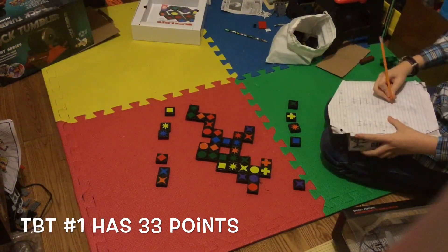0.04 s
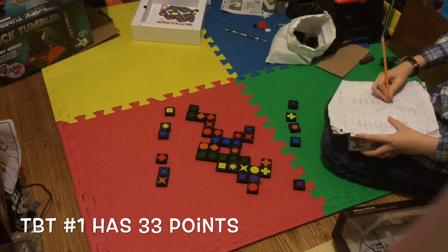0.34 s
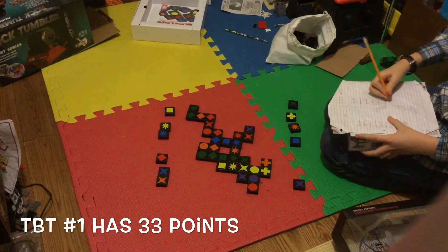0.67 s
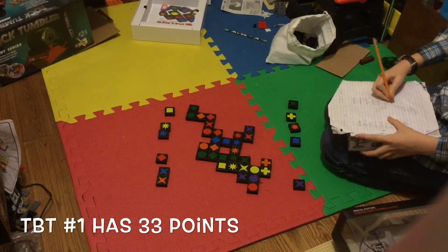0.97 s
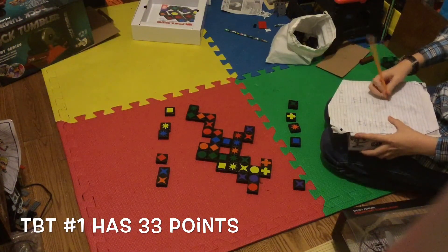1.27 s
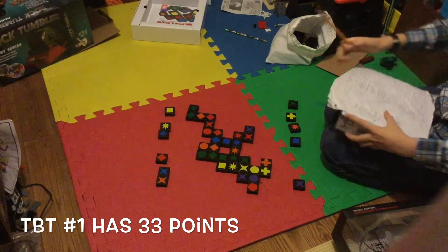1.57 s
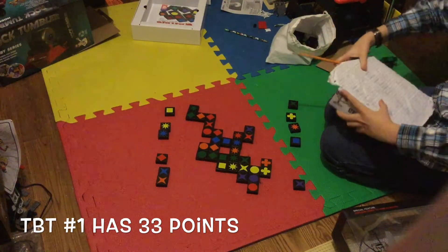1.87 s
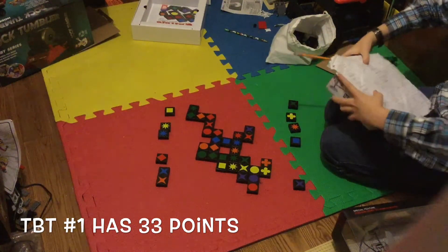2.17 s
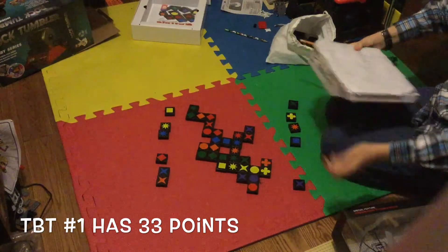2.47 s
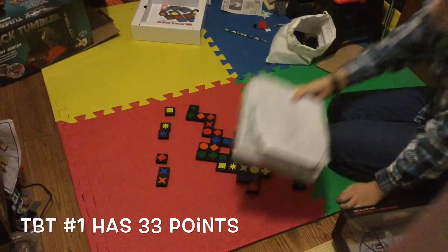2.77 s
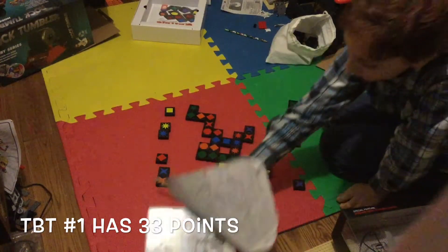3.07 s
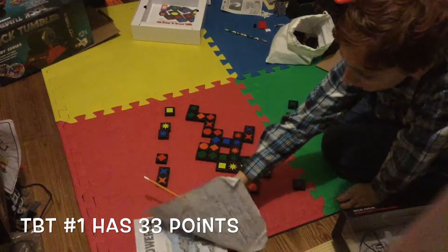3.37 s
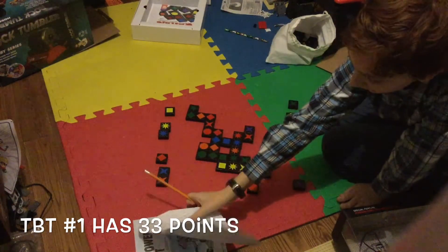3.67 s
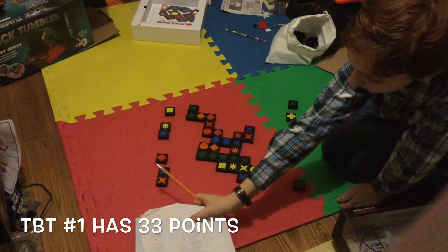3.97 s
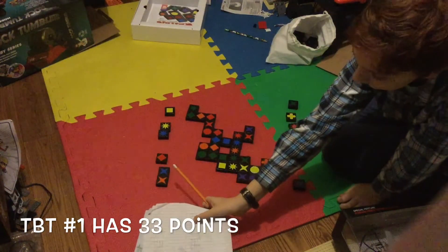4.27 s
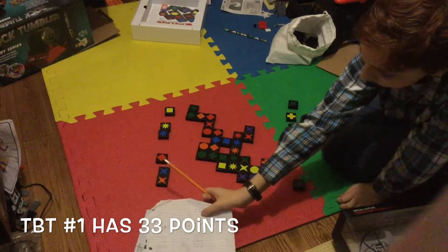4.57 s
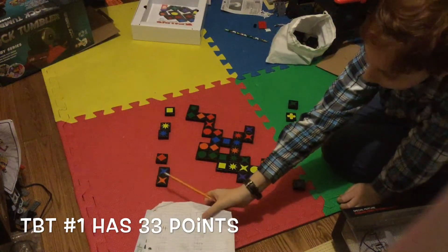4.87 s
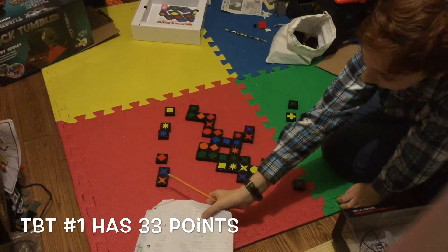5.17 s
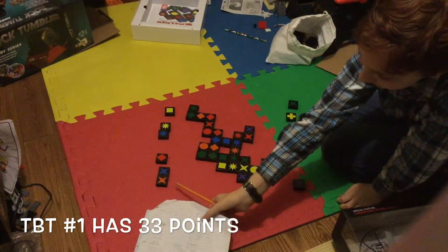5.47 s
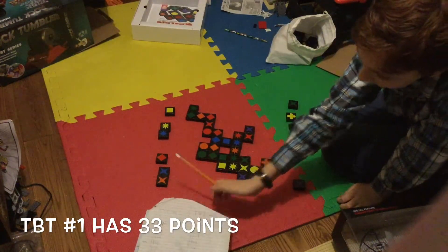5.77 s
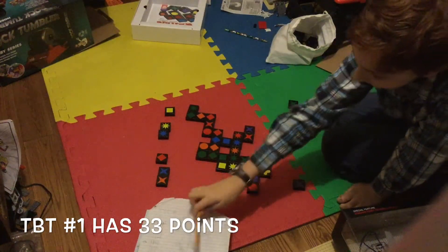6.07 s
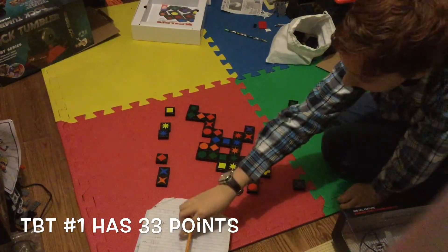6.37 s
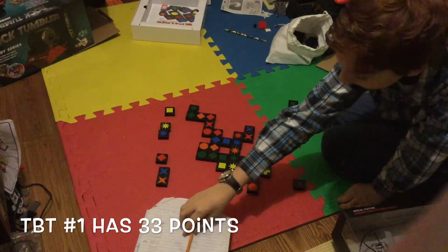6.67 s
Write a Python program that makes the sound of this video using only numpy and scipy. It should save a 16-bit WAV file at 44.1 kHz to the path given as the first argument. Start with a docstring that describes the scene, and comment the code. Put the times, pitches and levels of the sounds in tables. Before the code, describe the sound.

In a small room, a pencil scratches softly on paper close to the microphone. The pad is swung round, its sheets rustling and crackling, and is slapped down on the floor. The paper is smoothed amid a few light pencil taps, and finally the pencil is put down with a sharp knock. Through the walls, a heavy engine hums, deepens to a rumble and fades.

```python
"""Keeping score indoors, engine outside

On the floor of a small room, one microphone close to the score pad of a tile game. A pencil scratches,
the pad is swung round, crackles and is slapped down, the sheets are smoothed, and at last the pencil
is put down on it with a sharp knock. Through the walls a heavy engine hums and rumbles away."""
import sys
import numpy as np
from scipy import signal
from scipy.fft import rfft, irfft, next_fast_len
from scipy.io import wavfile
from scipy.ndimage import uniform_filter1d

SR = 44100
rng = np.random.default_rng(int(sys.argv[2]) if len(sys.argv) > 2 else 0)


def inscribe(sig):
    """Save sig as 16-bit PCM at rate SR to the path in sys.argv[1].

    A 1-D sig is mono; a 2-D sig holds one channel per row.
    Samples are clipped to [-1, 1] before scaling.
    """
    pcm = np.round(np.clip(np.atleast_2d(sig).T, -1, 1) * 32767)
    wavfile.write(sys.argv[1], SR, pcm.astype(np.int16))


N = 305613

# Bright sheen of paper and ticks. Each row, as in every spectrum here: frequency in Hz, relative dB.
SHEEN_SPECTRUM = [(2000, -5), (6000, 0), (9000, 4.5), (13000, 2), (16000, 0.5)]


def pencil_strokes(writing_s=1.8, strokes_per_s=7.85, stroke_s=0.16, press_db_per_s=2.5):
    """Lead and fingers drag over paper fibres: light strokes scratch, heavy ones ring the pad and hiss."""
    # Each row: start in seconds, length in seconds, rub in dB, hiss in dB.
    heavy_strokes = [(0.224, .053, -50, -80), (0.402, .058, -46, -60), (.55, 0.037, -55, -60),
                     (1.041, .11, -42, -69), (1.134, .11, -44.5, -67), (1.39, 0.075, -61, -54),
                     (1.456, 0.063, -47, -70)]
    # Spectra of the rubbed pad and of the scratching lead.
    rub_spectrum = [(400, -20.5), (950, -7.5), (1250, 1.5), (1600, -3), (2000, -16.5), (4000, -24),
                    (9000, -36)]
    scratch_spectrum = [(1500, -16), (3000, -9), (4000, 5), (5000, -0.5), (6500, -18), (12000, -27.5)]
    rub, scratch, hiss = np.zeros((3, N))
    for s, length, rub_db, hiss_db in heavy_strokes:
        speed = signal.windows.tukey(int(length * SR), .7)
        add(rub, s, speed * undb(rub_db))
        add(hiss, s, speed * undb(hiss_db))
    light_stroke = signal.windows.tukey(int(stroke_s * SR), .7)
    for k, (late, force) in enumerate(rng.standard_normal((40, 2))):
        s = (k + .5 + .15 * np.tanh(late)) / strokes_per_s
        if s < writing_s:
            db = -63.5 + press_db_per_s * s + np.tanh(force)  # the hand bears down harder as it goes
            add(scratch, s, light_stroke * undb(db))
    grain = friction(clicks_per_s=6000, spread_db=1.3) * undb(4 * np.tanh(walk(110)))
    parts = (rub, rub_spectrum), (scratch, scratch_spectrum), (hiss, SHEEN_SPECTRUM)
    return room(sum(envelope * unit(colour(grain, spectrum)) for envelope, spectrum in parts))


def paper_rustle(edge_s=0.18):
    """Sheets and sleeve slide and crinkle in small spurts."""
    # Each row: start in seconds, length in seconds, level in dB, treble in dB against that level.
    slides = [(1.454, 0.4, -50.5, -4.5), (1.855, 0.48, -53.5, -1.5), (2.223, .14, -37, -13),
              (2.587, 0.078, -55, 2.5), (2.68, 0.22, -49, -7), (2.971, 0.081, -36, -3.5),
              (3.042, 0.28, -37, -7), (3.277, 0.21, -38.5, -3), (3.45, 0.4, -52.5, -7),
              (3.81, 0.19, -47.5, -7.5), (4.205, .13, -58, 1), (4.564, 0.058, -57, 13.5),
              (4.85, 0.18, -60, -1), (5.053, .07, -50.5, -4), (5.297, 0.38, -60, 4.5),
              (5.646, 0.11, -54, 3.5)]
    # Spectrum of the sliding sheets.
    rustle_spectrum = [(150, -19), (480, 5), (800, 0.5), (1400, 11), (2300, 2), (3800, 5.5), (6000, 0.5),
                       (9000, -2.5), (16000, -26.5)]
    body = sum(swell(s, length, db, edge_s) for s, length, db, _ in slides)
    sheen = sum(swell(s, length, db + treble_db, edge_s) for s, length, db, treble_db in slides)
    grain = friction(clicks_per_s=2200, spread_db=4.8) * undb(5 * np.tanh(walk(60)))
    return room(body * unit(colour(grain, rustle_spectrum)) + sheen * unit(colour(grain, SHEEN_SPECTRUM)))


def paper_snaps(strain_s=0.0045, crack_s=0.0012, crumple_s=0.0079, creases_per_s=1500, gain_db=14):
    """A sheet strains and buckles with a crack, and smaller creases follow it."""
    # Each row: time in seconds, relative level in dB, amount of body, amount of treble.
    buckles = [(2.207, -24.5, 0, -15), (2.2593, -15.5, -49, -18), (2.2732, -12.5, -20, -20),
               (2.331, -21, -28, -32), (2.7739, -19, 4, -22.5), (2.992, -8, -10.5, -13.5),
               (3.024, -20.5, -22, -24), (3.077, -14, -11, -18.5), (3.093, -21, -12, -20),
               (3.1476, -15.5, 12, -9), (3.1951, -10, 3.5, -26), (3.3172, -17.5, -1, -50),
               (3.3724, -15, 2, -20.5), (3.458, -20.5, -8, -39), (3.5133, -18, -1, -16.5),
               (3.702, -15.5, -9, -18), (3.8468, -21, -9, -39), (3.973, -19.5, -24, -37),
               (3.992, -25.5, -34, -19), (4.0172, -26, -10, -26), (4.046, -22.5, -22, -28),
               (4.0565, -18, -10, -1), (4.6025, -24.5, -6, -16), (4.7125, -28.5, -48, -23),
               (4.81, -28, -11, -19), (4.8617, -20.5, -15, -18.5), (5.1339, -17.5, -26, -21.5)]
    # Spectrum of a buckling sheet.
    snap_spectrum = [(100, -22), (450, -2), (900, 0), (1500, 0.5), (2500, 1), (3700, 2.5), (6000, 0),
                     (8000, -6.5), (10500, -10), (13000, -11), (17000, -20)]
    lead_s = .02  # the strain starts ahead of the crack
    out, t = np.zeros(N), np.arange(SR // 3) / SR - lead_s
    age = np.maximum(t, 0) / crack_s
    for s, db, body, treble in buckles:
        crack = rng.standard_normal(len(t)) * np.sqrt(age) * np.exp(-age)
        creases = rng.standard_normal(len(t)) * (rng.random(len(t)) < creases_per_s / SR)
        creases *= np.where(t < 0, .6 * np.exp(t / strain_s), np.exp(-t / crumple_s))
        push = unit(crack) + undb(-3) * unit(creases)
        # a wide fold has more body, a tight crease more treble
        tilt = [(600, 0.23 * (body + 18)), (1300, 0.74 * (body + 17.5)),
                (3500, 0.0077), (9000, 0.8 * (treble + 22.5))]
        snap = unit_energy(colour(push, snap_spectrum, tilt))
        add(out, s - lead_s, room(snap, wet_db=0) * undb(db + gain_db))
    return out


def pad_slaps(gain_db=11, flap_db=-5):
    """The pad lands edge first, then flat; soft contact keeps the treble out and the sheets flap after."""
    # Each row: time in seconds, relative level in dB, contact time in seconds.
    slaps = [(.953, -13, 0.00086), (2.227, -17.5, 0.00069), (2.28, -11.5, 0.0008), (3.193, -1.5, 0.0011),
             (3.198, -1, 0.0011), (3.215, -0.5, 0.00059), (3.244, -8.5, .00015)]
    # Modes of the pad on the floor. Each row: frequency in Hz, relative dB, T60 in seconds.
    pad_modes = [(122, -1.5, 0.35), (163, 8.5, 0.12), (328, -8, 0.47), (397, 5.5, 0.18), (524, 2, 0.11),
                 (615, -3, 0.23), (746, 4.5, 0.06), (745, -4, 0.052), (913, -9, 0.1), (1156, 3, 0.085),
                 (1276, 2, 0.13), (1560, -16, .1)]
    # Spectrum of the flapping sheets.
    flap_spectrum = [(60, -40), (160, -4), (500, 7), (1300, 0), (3000, -6.5), (9000, -31)]
    out, t = np.zeros(N), np.arange(SR // 2) / SR
    for s, db, contact_s in slaps:
        flap = room(burst(flap_spectrum, t, decay_s=0.021))
        blow = ring(pad_modes, t) + undb(flap_db) * unit_energy(flap)
        push = np.hanning(int(contact_s * SR) + 3)
        add(out, s, np.convolve(blow, push / push.sum()) * undb(db + gain_db))
    return out


def pencil_knock(tick_gain_db=6, knock_gain_db=13, thud_db=-1):
    """The pencil is put down: the tip ticks, then the wooden shaft knocks on the pad, rocks and settles."""
    # Each row: time in seconds, relative levels of tip and of shaft in dB.
    contacts = [(6.566, -6.5, -39), (6.5691, -3.5, -3), (6.5722, -14, -15.5), (6.585, -25, -11),
                (6.68, -21.5, -35), (6.686, -40, -26)]
    # Modes of the knock on the pad. Each row: frequency in Hz, relative dB, T60 in seconds.
    knock_modes = [(142, -3, 0.14), (348, -1.5, 0.1), (397, -8, 0.065), (471, 4.5, 0.3), (512, -15, 0.35),
                   (730, 3, 0.054), (825, 0.5, 0.13), (970, -1, 0.084), (1084, 2, 0.15), (1137, 0.5, 0.12),
                   (1209, 2.5, 0.14), (1870, 0, 0.041)]
    # Spectra of the tip's tick and of the shaft's thud.
    tick_spectrum = [(200, 5), (1000, -4), (2400, -9), (3800, -7.5), (5800, -1.5), (7300, -4.5),
                     (8800, -1.5), (11000, -1.5), (16000, -10.5)]
    thud_spectrum = [(70, -18), (170, -5), (420, 7.5), (800, 0.5), (1150, 4), (1500, -5), (2400, -13.5),
                     (4500, -29)]
    out, t = np.zeros(N), np.arange(SR // 2) / SR
    for s, tip_db, shaft_db in contacts:
        tick = unit_energy(burst(tick_spectrum, t, decay_s=0.00076))
        thud = room(burst(thud_spectrum, t, decay_s=0.003))
        knock = ring(knock_modes, t) + undb(thud_db) * unit_energy(thud)
        add(out, s, room(tick) * undb(tip_db + tick_gain_db))
        add(out, s, knock * undb(shaft_db + knock_gain_db))
    return out


def pencil_taps():
    """The pencil taps the pad and its shaft rings briefly; the grip shifts, so each tap has its own pitch."""
    # Each row: time in seconds, level in dB.
    taps = [(2.774, -9.5), (4.711, -15.5), (4.861, -14.5), (5.134, -3), (5.614, -17), (5.718, -18)]
    # Modes of the shaft, damped by the fingers. Each row: frequency in Hz, relative dB, T60 in seconds.
    shaft_modes = [(805.5, 5, 0.025), (1260, 7.5, 0.018), (1610, -1, 0.041), (2420, -0.5, 0.037),
                   (3450, -5, 0.016), (3530, 7, 0.013)]
    out, t = np.zeros(N), np.arange(SR // 3) / SR
    for s, db in taps:
        modes = [(hz * (1 + .05 * rng.standard_normal()), mode_db, t60) for hz, mode_db, t60 in shaft_modes]
        add(out, s, room(ring(modes, t), wet_db=-3) * undb(db))
    return out


def close_tick():
    """A tiny bright tick, so near the microphone that it raises little of the room."""
    # Each row: time in seconds, level in dB.
    ticks = [(4.198, -10)]
    out, t = np.zeros(N), np.arange(SR // 4) / SR
    for s, db in ticks:
        tick = unit_energy(burst(SHEEN_SPECTRUM, t, decay_s=.001))
        add(out, s, room(tick, wet_db=-5) * undb(db))
    return out


def engine_hum():
    """Only low engine orders pass the walls; they swell and sink as they cross the room's resonances."""
    # Engine speed. Each row: time in seconds, cycles a second.
    speed_curve = [(0, 40.2), (.25, 40.7), (.6, 39.2), (1, 39.3), (1.3, 38.7), (3.1, 38.5)]
    # Each row: start in seconds, length in seconds, engine order, level in dB.
    hum_swells = [(-.04, 0.36, 4, -19), (0.413, 0.46, 4, -15), (0.83, 0.708, 4, -28), (1.504, 0.56, 4, -28),
                  (2.257, 0.35, 4, -31), (2.708, 0.38, 4, -35.5), (-.1, 1.06, 6, -34),
                  (1.04, 0.356, 6, -34.5), (1.653, 0.75, 6, -42.5), (.95, 0.56, 2, -41),
                  (1.7, 1.53, 5, -44.5)]
    hum, speed = np.zeros(N), curve(speed_curve)
    for s, length, order, db in hum_swells:
        envelope = swell(s, length, db, edge_s=0.14, rise_db_per_s=1.5)
        flutter_db = .6 if order == 4 else 1.3
        hum += envelope * tone(speed, order) * undb(flutter_db * walk(18))
    return hum


def engine_whine(settled_hz=280.2, sag_hz=19, settle_s=0.2707):
    """A higher, rougher hum of the engine sinks onto its pitch."""
    # Each row: start in seconds, length in seconds, level in dB.
    whine_swells = [(0, 0.22, -32), (0.218, 0.19, -28), (.41, 0.25, -32.5), (0.653, 0.509, -27),
                    (1.32, 0.81, -40.5), (2.197, 0.27, -41.5)]
    t = np.arange(N) / SR
    hz = settled_hz + sag_hz * np.exp(-t / settle_s)
    envelope = sum(swell(*row, edge_s=0.092) for row in whine_swells)
    roughness = undb(1.6 * walk(30.84))
    return envelope * roughness * tone(hz + 2.54 * walk(12))


def exhaust_drone(settled_hz=57.66, climb_hz=6.5, settle_s=1.0, edge_s=0.32):
    """The deep note of the exhaust climbs to its pitch under a wavering octave."""
    # Each row: start in seconds, length in seconds, level in dB, octave in dB against that level.
    drone_swells = [(.85, 1.1, -34, -19), (1.45, 1.23, -30.5, -8), (2.54, 0.76, -31, -9),
                    (3.132, 1.16, -31, -6.5), (4.247, 1.41, -44.5, 1.5)]
    t = np.arange(N) / SR
    hz = settled_hz - climb_hz * np.exp(-t / settle_s)
    deep_swells = [swell(s, length, db, edge_s) for s, length, db, _ in drone_swells]
    octave_swells = [swell(s, length, db + octave_db, edge_s) for s, length, db, octave_db in drone_swells]
    deep = np.max(deep_swells, axis=0) * undb(.6 * walk(21)) * tone(hz)
    octave = np.max(octave_swells, axis=0) * undb(1.3 * walk(13)) * tone(hz + 1.497 * walk(17), order=2)
    return deep + octave


def street_rumble(road_follow=0.61):
    """Exhaust rumble passes the walls and booms in a room resonance, with fainter road noise above it."""
    # The rumble drawing away and the boom near 140 Hz. Each row: time in seconds, relative level in dB.
    rumble_levels = [(0.0, -36.5), (2.76, -46), (2.95, -44.5), (3.86, -45.5), (4.03, -47.5), (5.94, -55.5),
                     (6.93, -60.5)]
    boom_levels = [(0, -46.5), (2.6, -47), (3.8, -40.5), (4.9, -37), (5.65, -48.5), (5.9, -52), (6.93, -74)]
    # Spectra of rumble, boom and road as heard indoors.
    rumble_spectrum = [(20, -30), (45, -23), (75, -2), (105, -4), (135, -2), (175, -7), (225, -14),
                       (290, -10.5), (350, -20.5), (500, -42), (1000, -71.5)]
    boom_spectrum = [(90, -42), (124, 2.5), (138, 10.5), (157, 5.5), (172, -7), (230, -51.5)]
    road_spectrum = [(100, -23.5), (300, 7), (750, 6.5), (1200, -3), (2200, -10.5), (4200, -15.5),
                     (6500, -24.5), (16000, -73.5)]
    db = curve(rumble_levels)
    rumble = noise(rumble_spectrum) * undb(db + 8.5 + 2 * walk(25))
    boom = noise(boom_spectrum) * undb(curve(boom_levels))
    road = noise(road_spectrum) * undb(road_follow * db - 24 + 0.38 * walk(15))
    return rumble + boom + road


def room_tone(db=-50):
    """The still air of the room, a faint steady noise."""
    # Spectrum of the air, mostly bass.
    air_spectrum = [(20, -26.5), (75, 2.5), (140, 1), (400, -30.5), (1200, -22.5), (2000, -31.5),
                    (6000, -33.5), (16000, -38.5)]
    return noise(air_spectrum) * undb(db)


def room(x, wet_db=1.5, low_t60_s=0.25, treble_t60_s=0.2):
    """Direct sound plus the diffuse tail of a small room; every position has its own tail."""
    t = np.arange(SR // 2) / SR
    echoes = rng.standard_normal(len(t)) * undb(2 * rng.standard_normal(len(t)))
    low = signal.sosfilt(signal.butter(1, 4000, fs=SR, output="sos"), echoes)
    tail = low * 1000 ** (-t / low_t60_s) + (echoes - low) * 1000 ** (-t / treble_t60_s)
    tail *= np.clip((t - .002) / 0.0018, 0, 1)  # first reflections arrive after 2 ms
    response = undb(wet_db) * unit_energy(tail)
    response[0] += 1
    return signal.fftconvolve(x, unit_energy(response))[:len(x)]


def friction(clicks_per_s, spread_db):
    """Paper fibres catch and let go: dense tiny clicks of uneven size."""
    caught = rng.random(N) < clicks_per_s / SR
    clicks = caught * rng.standard_normal(N)
    return unit(clicks * undb(spread_db * np.minimum(rng.exponential(size=N), 4)))


def ring(modes, t):
    """Free ring of a struck body, with unit energy."""
    return unit_energy(sum((-1) ** k * undb(db) * np.sin(2 * np.pi * hz * t) * 1000 ** (-t / t60)
                           for k, (hz, db, t60) in enumerate(modes)))


def burst(spectrum, t, decay_s):
    """Coloured noise that starts at once and dies away."""
    return colour(rng.standard_normal(len(t)) * np.exp(-t / decay_s), spectrum)


def noise(spectrum):
    """Coloured noise of rms 1."""
    return unit(colour(rng.standard_normal(N), spectrum))


def tone(hz, order=1):
    """A multiple of a moving pitch, with rms 1."""
    return np.sqrt(2) * np.sin(2 * np.pi * order * np.cumsum(hz) / SR)


def swell(s, length, db, edge_s, rise_db_per_s=0):
    """Envelope that fades in, holds or grows a little, and fades out."""
    age = np.arange(N) / SR - s
    edge = np.clip(np.minimum(age, length - age) / min(edge_s, length / 2), 0, 1)
    return np.sin(np.pi / 2 * edge) * undb(db + rise_db_per_s * (np.clip(age, 0, length) - length / 2))


def colour(x, spectrum, tilt=()):
    """Causal filter through (Hz, dB) points, with an optional second set of points on top."""
    n = next_fast_len(len(x) + 4096, True) // 2 * 2
    log_f = np.log(np.fft.rfftfreq(n, 1 / SR) + 1)
    shapes = [np.array(points) for points in (spectrum, tilt) if len(points)]
    db = sum(np.interp(log_f, np.log(shape[:, 0]), shape[:, 1]) for shape in shapes)
    cepstrum = irfft(db * np.log(10) / 20, n)
    cepstrum[1:n // 2] *= 2  # folded for minimum phase
    cepstrum[n // 2 + 1:] = 0
    return irfft(rfft(x, n) * np.exp(rfft(cepstrum)), n)[:len(x)]


def walk(rate_hz):
    """Smooth random drift of rms 1."""
    step = max(int(SR / rate_hz), 1)
    held = np.repeat(rng.standard_normal(N // step + 1), step)[:N]
    return unit(uniform_filter1d(uniform_filter1d(held, step), step))


def curve(points):
    """Points of (seconds, value) joined by lines, read at every sample."""
    return np.interp(np.arange(N) / SR, *np.transpose(points))


def add(track, s, sound):
    """Mix a sound into a track at time s."""
    i = int(s * SR)
    track[i:i + len(sound)] += sound[:N - i]


def undb(db):
    """Decibels to gain."""
    return 10 ** (np.asarray(db) / 20)


def unit(x):
    """Scale to rms 1."""
    return x / np.sqrt(np.mean(x ** 2) + 1e-20)


def unit_energy(x):
    """Scale so that the squares sum to 1."""
    return x / np.linalg.norm(x)


def scene():
    """Pencil and paper close by, the engine beyond the walls and room tone under both, in mono."""
    air = room_tone()
    nearby = pencil_strokes() + paper_rustle() + paper_snaps() + pad_slaps()
    nearby += close_tick() + pencil_taps() + pencil_knock()
    outside = engine_hum() + engine_whine() + exhaust_drone() + street_rumble()
    return (nearby + outside + air)[None]


def record(dry):
    """The recorder cuts the treble steeply above 16 kHz."""
    return signal.sosfilt(signal.ellip(10, .2, 80, 16000, fs=SR, output="sos"), dry)


dry = scene()
out = record(dry)
inscribe(out)
```